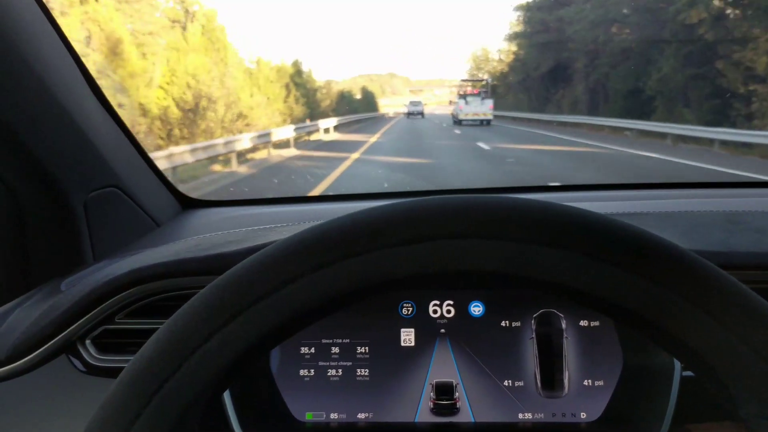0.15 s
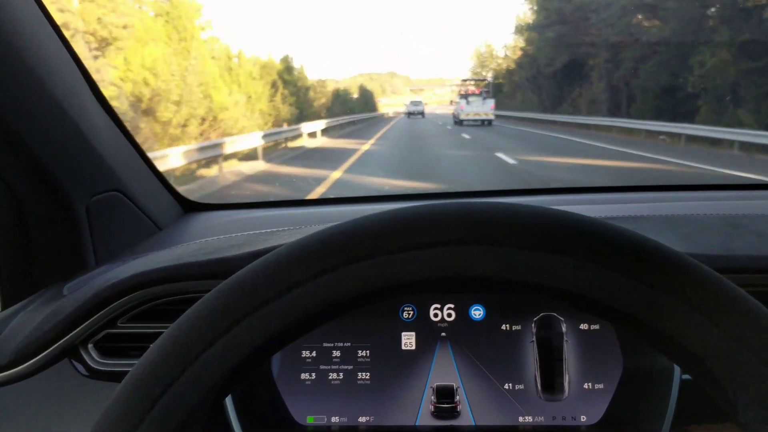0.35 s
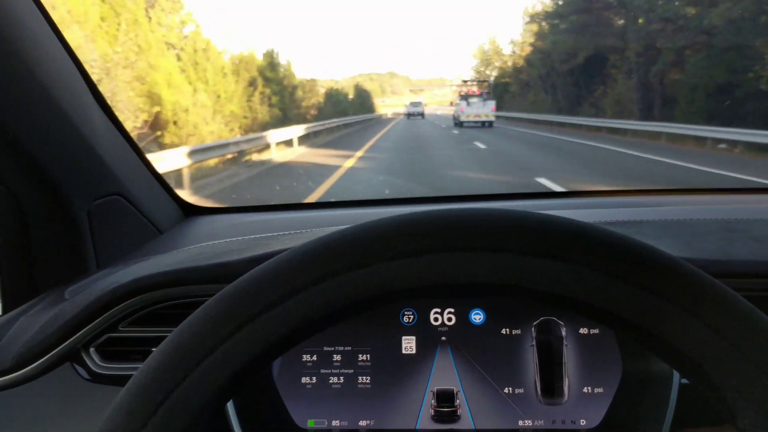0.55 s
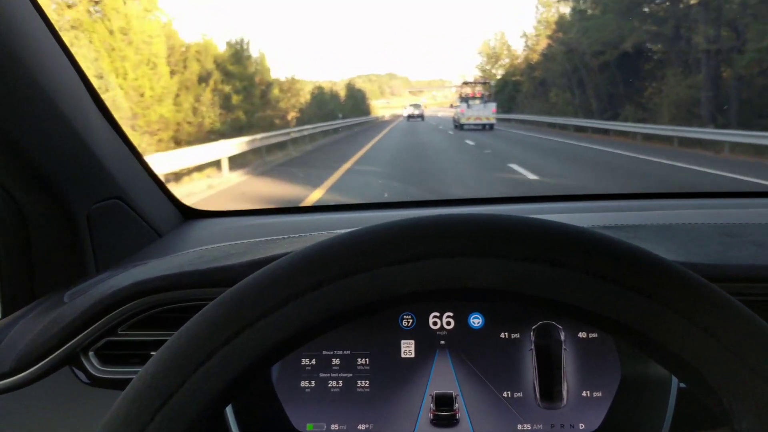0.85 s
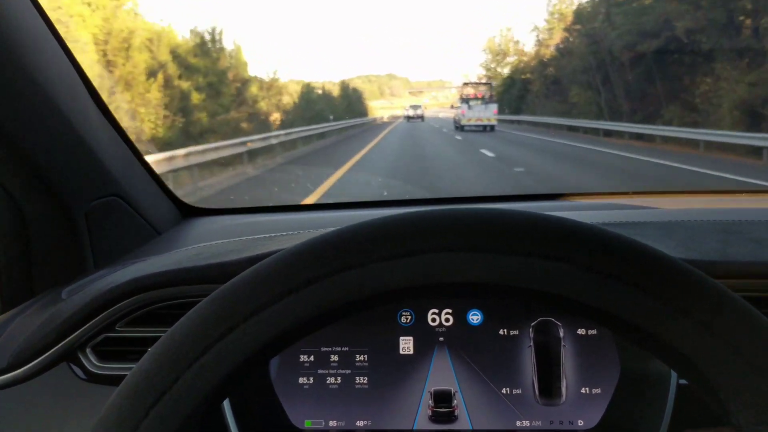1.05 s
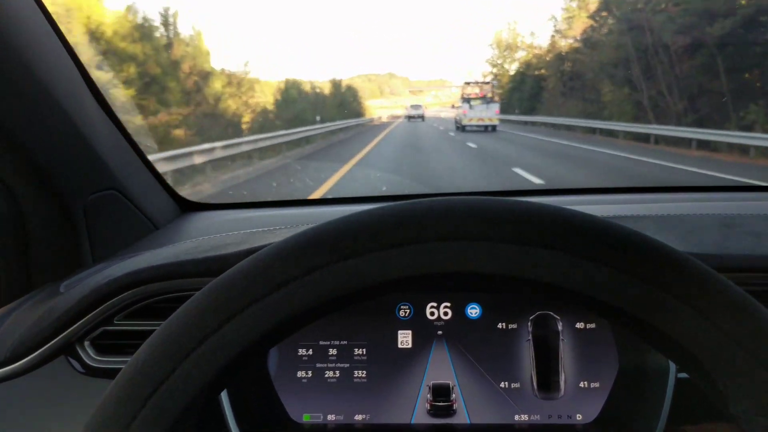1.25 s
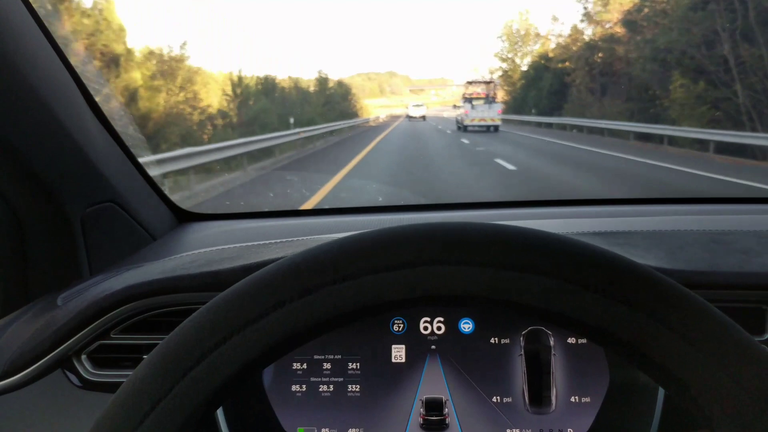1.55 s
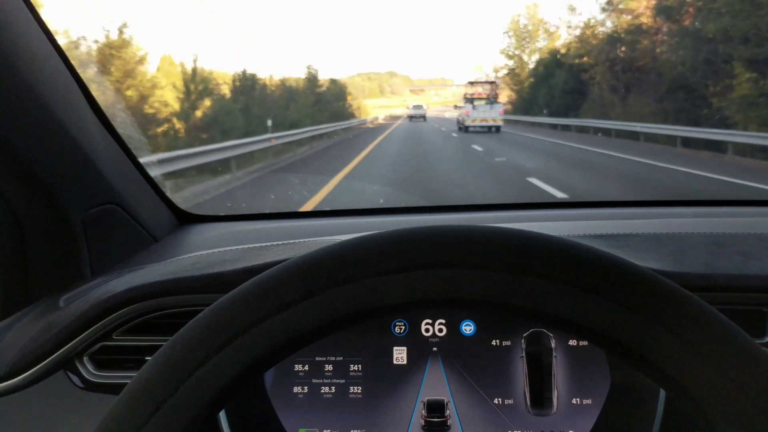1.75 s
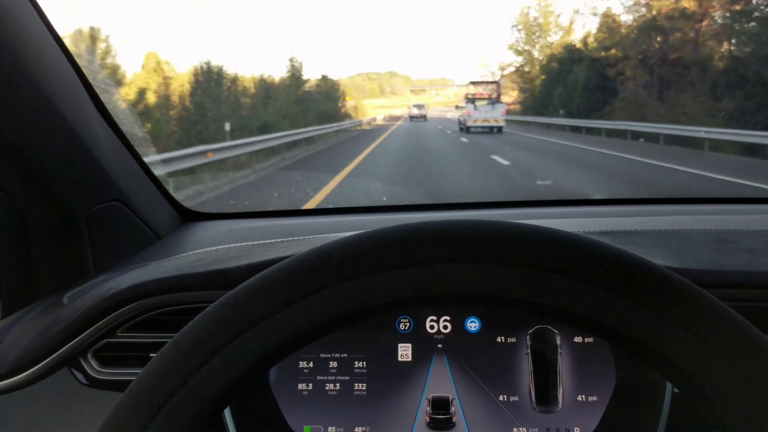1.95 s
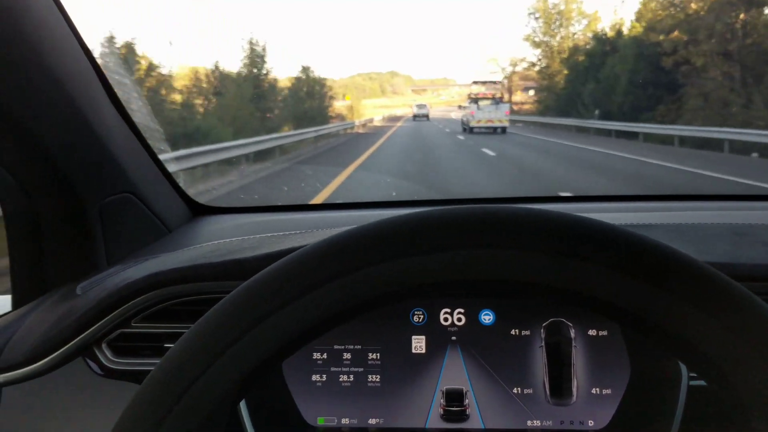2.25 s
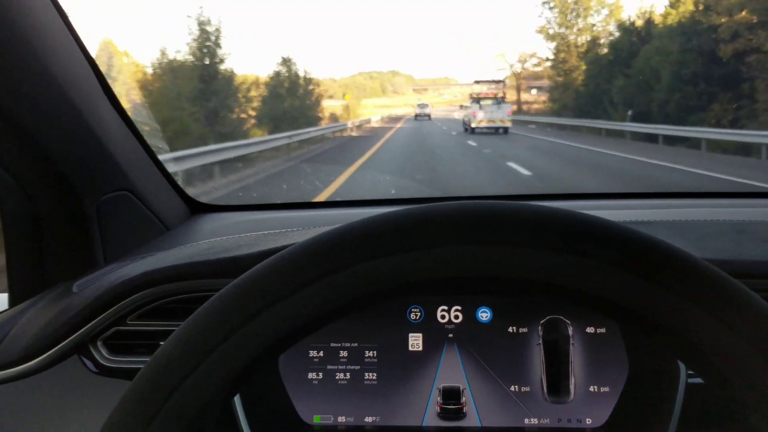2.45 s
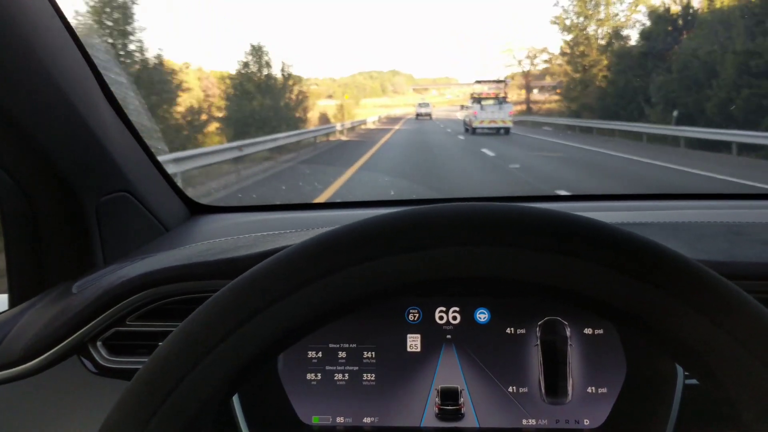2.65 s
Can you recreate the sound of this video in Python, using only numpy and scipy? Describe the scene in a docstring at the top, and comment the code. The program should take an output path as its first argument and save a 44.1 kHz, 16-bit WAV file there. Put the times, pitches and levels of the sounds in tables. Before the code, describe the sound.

Continuous highway road noise from inside a moving car: a wavering low boom and soft, dull wind roar throughout, no engine, a few very faint dry ticks and slight hiss at the cabin microphone.

```python
"""Road noise inside a quiet electric car at highway speed, as a microphone in the cabin hears it.
Random road texture shakes the tyres and body: a wavering low boom, heave and rumble come in lumps.
Tread and wind roar lies above, with cabin and panels ringing at fixed resonances.
Faint double ticks, trim clicks and a thin pulsing whine sit near the microphone's own hiss."""
import sys
import numpy as np
from scipy import signal
from scipy.fft import rfft, irfft, next_fast_len
from scipy.io import wavfile
from scipy.ndimage import uniform_filter1d

SR = 44100
rng = np.random.default_rng(int(sys.argv[2]) if len(sys.argv) > 2 else 0)


def materialize(psi):
    """Save the field psi as 16-bit PCM at rate SR to the path in sys.argv[1].

    A 1-D psi becomes a single channel; in a 2-D psi each row is a channel.
    """
    bounded = np.clip(np.atleast_2d(psi).T, -1, 1)
    quanta = np.round(bounded * 32767).astype(np.int16)
    wavfile.write(sys.argv[1], SR, quanta)


def nominal_scale(level):
    """Amplitude ratio for a level in decibels (scalar or array-like)."""
    x = np.asarray(level, float) / 20
    return 10 ** x


N = 123479  # samples, 2.8 s


def rms_one(x):
    """Scales a signal to an rms of 1."""
    return x / np.sqrt(np.mean(x ** 2) + 1e-20)


def in_time(rows):
    """Draws each column after start_s as a curve, straight between its points."""
    start_s, *columns = np.transpose(rows)
    return [np.interp(np.arange(N) / SR, start_s, column) for column in columns]


def coloured(shape):
    """Noise with the given spectrum, straight in dB over log frequency; rms 1."""
    size = next_fast_len(N)
    hz = np.maximum(np.arange(size // 2 + 1) * SR / size, 1)
    shape_hz, shape_db = np.transpose(shape)
    gain = nominal_scale(np.interp(np.log(hz), np.log(shape_hz), shape_db))
    spectrum = rfft(rng.standard_normal(size)) * gain
    return rms_one(irfft(spectrum, size)[:N])


def drift(rate_hz):
    """Slow random wander of spread 1: noise through two equal low-pass poles at rate_hz."""
    step = 40  # samples between drawn points
    r = np.exp(-2 * np.pi * rate_hz * step / SR)
    settle = 2000  # points dropped while the filter settles
    noise = rng.standard_normal(N // step + 2 + settle)
    slow = signal.lfilter([1], [1, -2 * r, r * r], noise)[settle:]
    return np.interp(np.arange(N) / step, np.arange(len(slow)), rms_one(slow - slow.mean()))


def resonate(x, hz, width_hz):
    """Two-pole resonance, gain 1 on top."""
    r = np.exp(-np.pi * width_hz / SR)
    zeros = np.array([1, 0, -1]) * (1 - r * r) / 2
    poles = [1, -2 * r * np.cos(2 * np.pi * hz / SR), r * r]
    return signal.lfilter(zeros, poles, x)


def resonate_twice(x, hz, width_hz):
    """The same resonance passed twice, for steeper sides."""
    return resonate(resonate(x, hz, width_hz), hz, width_hz)


def humming(hz, width_hz):
    """Road shaking heard through one steep resonance; rms 1."""
    shaking = rng.standard_normal(N + SR // 2)  # the first half second lets the ring build up
    return rms_one(resonate_twice(shaking, hz, width_hz)[-N:])


def evened(x, share, window_s):
    """Takes out a share of the noise's own slow swell, so that the level curve rules; rms 1."""
    power = uniform_filter1d(x ** 2, int(window_s * SR))
    return rms_one(x / (power + 0.0011) ** (share / 2))


def swelling(modes, level_db, share, window_s):
    """Resonances that rise and fall together on one level curve."""
    ringing = sum(nominal_scale(db) * evened(humming(hz, width_hz), share, window_s) for hz, width_hz, db in modes)
    return nominal_scale(level_db) * ringing


def impulses(start_s, level_db):
    """Single-sample knocks at the given times, in near silence."""
    out = np.full(N, 1e-18)
    out[(np.asarray(start_s) * SR).astype(int)] = nominal_scale(level_db)
    return out


# wavering boom, before the lumps set the overall level: start_s, level_db
BOOM_LEVEL = [(0.03, -29), (0.31, -37.5), (0.63, -32.5), (0.67, -45), (0.7, -36), (0.85, -32.5),
              (0.91, -49), (0.96, -35), (2.08, -39.5), (2.15, -26), (2.23, -35), (2.38, -31.5),
              (2.71, -34.5), (2.75, -44.5)]
# noise below and above the boom, on the same relative scale: start_s, heave_db, rumble_db
HEAVE_AND_RUMBLE_LEVEL = [(0.03, -38.5, -30.5), (0.05, -36, -32), (0.35, -38, -40), (0.39, -42, -30),
                          (0.42, -40, -32), (0.57, -33.5, -35), (0.61, -41, -23), (0.67, -44, -40),
                          (1.07, -39.5, -35.5), (1.13, -48, -39), (1.17, -33.5, -37), (1.33, -43, -43),
                          (2.73, -38.5, -35), (2.75, -38, -26)]
# spectrum of the broad rumble: frequency_hz, relative_db
RUMBLE_SPECTRUM = [(45, -38), (65, -13), (88, -2), (105, -3), (145, -4.5), (180, -14), (235, -20),
                   (300, -80)]
# spectrum of the slow heave: frequency_hz, relative_db
HEAVE_SPECTRUM = [(12, -57), (22, -26), (30, 1.5), (40, 16.5), (51, 19), (62, 15.5), (75, 2), (95, -49)]
# surges of the whole low end: start_s, level_db
LUMP_LEVEL = [(0.02, -30.5), (0.07, -32.5), (0.09, -34), (0.14, -29), (0.38, -35), (0.4, -29), (0.44, -30),
              (0.46, -36.5), (0.5, -29), (0.54, -36), (0.56, -29.5), (0.63, -31), (0.66, -34),
              (0.68, -31.5), (0.8, -27.5), (0.83, -38), (0.85, -23.5), (0.87, -34), (0.93, -32.5),
              (0.95, -26), (1.0, -32), (1.01, -43), (1.04, -25.5), (1.15, -33.5), (1.19, -25), (1.21, -31),
              (1.39, -30), (1.42, -42), (1.45, -26.5), (1.56, -34.5), (1.58, -30), (1.79, -30.5),
              (1.95, -33.5), (1.97, -32), (2.09, -32.5), (2.15, -25), (2.25, -34), (2.26, -31.5),
              (2.33, -28.5), (2.36, -32.5), (2.39, -26), (2.41, -33), (2.43, -28.5), (2.48, -25),
              (2.49, -33), (2.58, -28.5), (2.61, -33), (2.64, -29), (2.76, -31.5), (2.78, -30)]
BOOM_HZ, BOOM_WANDER_HZ, BOOM_FLICKER_DB = 74.65, 5.02, 2.5  # centre, spread of pitch, spread of level


def low_end():
    """Slow heave and broad rumble around a boom whose pitch wanders; together they come in lumps."""
    heave_db, rumble_db = in_time(HEAVE_AND_RUMBLE_LEVEL)
    boom_pitch_hz = BOOM_HZ + BOOM_WANDER_HZ * drift(8.4)
    boom_db = in_time(BOOM_LEVEL)[0] + BOOM_FLICKER_DB * drift(18.0)
    phase = 2 * np.pi * np.cumsum(boom_pitch_hz) / SR
    boom = nominal_scale(boom_db) * rms_one(np.sin(phase))
    heave = nominal_scale(heave_db) * evened(coloured(HEAVE_SPECTRUM), share=0.47, window_s=0.16)
    rumble = nominal_scale(rumble_db) * evened(coloured(RUMBLE_SPECTRUM), share=0.35, window_s=0.08)
    together = rms_one(boom + heave + rumble)
    return nominal_scale(in_time(LUMP_LEVEL)[0]) * evened(together, share=0.85, window_s=0.035)


# tread and wind roar, and the panels ringing with the road: start_s, roar_db, panel_db
ROAR_AND_PANEL_LEVEL = [(0, -42.5, -46), (.25, -42.5, -50), (.5, -41.5, -44), (.72, -43.5, -52.5),
                        (1.0, -42, -46), (1.25, -43.5, -51), (1.52, -41.5, -46), (1.75, -41, -51),
                        (1.9, -42, -52), (2.06, -41.5, -44.5), (2.25, -41.5, -49.5), (2.55, -41.5, -47.5),
                        (2.8, -42.5, -45)]
# spectrum of the roar: frequency_hz, relative_db
ROAR_SPECTRUM = [(150, -20), (230, 0), (450, -2), (650, -2), (1000, -3), (1400, -7), (2100, -13),
                 (2800, -19), (3200, -25), (4000, -29), (5000, -36), (6200, -41), (7200, -50), (10000, -80)]


def tread_and_wind_roar():
    """Tread and wind leak in as noise of a fixed spectrum whose level flickers slightly."""
    roar_db = in_time(ROAR_AND_PANEL_LEVEL)[0] + 0.4 * drift(1.5)
    return nominal_scale(roar_db) * coloured(ROAR_SPECTRUM)


# steady resonances of tyre, floor and cabin, each passed twice: pitch_hz, width_hz, level_db
BODY_MODES = [(131.7, 8.2, -46), (185.6, 22, -51.5), (248, 34, -55.5), (416, 69, -59.5), (527, 58, -64.5),
              (593, 31, -61), (930, 69, -55.5), (1112, 75, -54.5), (1188, 110, -53.5), (1341, 38, -60),
              (1477, 13, -64.5), (1550, 66, -62)]


def body_resonances():
    """Random road shaking keeps the fixed resonances of tyre, floor and cabin humming."""
    return sum(nominal_scale(db) * humming(hz, width_hz) for hz, width_hz, db in BODY_MODES)


# swell of the hollow cabin ring: start_s, level_db
CABIN_LEVEL = [(0.0, -45.5), (0.06, -34), (0.09, -45), (0.59, -40), (0.63, -46), (0.93, -40), (0.95, -45.5),
               (1.46, -43), (1.54, -51.5), (1.57, -40), (1.78, -48), (1.84, -40), (2.38, -45.5),
               (2.43, -41), (2.47, -47), (2.8, -43)]
# cabin resonances, each passed twice: pitch_hz, width_hz, relative_db
CABIN_RING = [(306.8, 54, -6), (360.4, 53, -3)]


def cabin_ring():
    """The cabin rings hollowly at two fixed resonances that swell together."""
    return swelling(CABIN_RING, in_time(CABIN_LEVEL)[0], share=0.2, window_s=0.059)


# panel resonances, each passed twice: pitch_hz, width_hz, relative_db
PANEL_MODES = [(718, 25.3, -1.5), (790, 45, -0.5)]


def ringing_panels():
    """Panels shaken by the road ring at two fixed resonances that swell together."""
    panel_db = in_time(ROAR_AND_PANEL_LEVEL)[1]
    return swelling(PANEL_MODES, panel_db, share=0.35, window_s=0.07)


# double ticks, strength of the knock before its resonances: start_s, level_db
DOUBLE_TICKS = [(.3019, -43), (.3685, -43.5), (.411, -43), (.4649, -42), (1.5639, -42.5), (1.6248, -42),
                (1.6648, -42.5), (1.7012, -42.5), (2.5638, -42.5), (2.6041, -43.5), (2.6648, -42),
                (2.7048, -42.5)]
TICK_GAP_S, SECOND_TICK_DB = 0.0121, 1  # second snap after the first, and its relative strength
REBOUND_S, REBOUND_DB = 0.0039, -6  # rebound after the first snap, and its relative strength
TICK_HZ, SECOND_TICK_HZ, DULL_TICK_HZ, TICK_WIDTH_HZ = 8700, 9300, 6000, 3600  # each passed twice


def ticks():
    """Each tick is two short dry snaps, the first with a faint rebound, the second with a duller part."""
    start_s, level_db = np.transpose(DOUBLE_TICKS)
    rebound = impulses(start_s + REBOUND_S, level_db + REBOUND_DB)
    first = impulses(start_s, level_db) + rebound
    second = impulses(start_s + TICK_GAP_S, level_db + SECOND_TICK_DB)
    first_snap = resonate_twice(first, TICK_HZ, TICK_WIDTH_HZ)
    second_snap = resonate_twice(second, SECOND_TICK_HZ, TICK_WIDTH_HZ)
    dull_part = nominal_scale(-4) * resonate_twice(second, DULL_TICK_HZ, TICK_WIDTH_HZ)
    return first_snap + second_snap + dull_part


# trim clicks, strength of the knock that starts them: start_s, level_db
TRIM_HITS = [(.3415, -52), (1.4303, -63)]
# ringing of the trim: pitch_hz, relative_db, t60_s
TRIM_MODES = [(4050, 0, .025), (4600, -5, .01), (5600, -4, .009), (6250, -5, .009), (7800, -12, .007),
              (9600, -10, .005), (10600, -4, .005), (12200, -12, .004)]
SNAP_DB, SNAP_T60_S, SNAP_HZ, SNAP_WIDTH_HZ = 1, 0.012, 6000, 6000  # noise burst, relative to the knock


def trim_clicks():
    """Plastic trim snaps, a short burst of noise, and rings briefly in decaying sines."""
    hits = impulses(*np.transpose(TRIM_HITS))
    decay = signal.lfilter([nominal_scale(SNAP_DB)], [1, -nominal_scale(-60 / (SNAP_T60_S * SR))], hits)
    out = resonate(decay * rng.standard_normal(N), SNAP_HZ, SNAP_WIDTH_HZ)
    for hz, db, t60_s in TRIM_MODES:
        r = nominal_scale(-60 / (t60_s * SR))
        w = 2 * np.pi * hz / SR
        out = out + nominal_scale(db) * signal.lfilter([0, np.sin(w)], [1, -2 * r * np.cos(w), r * r], hits)
    return out


# course of the thin whine, before its random wander: start_s, pitch_hz
WHINE_PITCH = [(0, 11820), (.16, 11880), (.25, 11800), (.34, 12120), (.43, 12040), (.6, 12220),
               (.76, 12000), (.85, 12140), (.96, 11950), (1.03, 12250), (1.11, 12010), (1.24, 12040),
               (1.3, 12270), (1.54, 12250), (1.63, 12080), (1.83, 12100), (2.03, 11980), (2.16, 12140),
               (2.3, 12080), (2.52, 12420), (2.64, 12160), (2.8, 12300)]
WHINE_DB, WHINE_FLICKER_DB, WHINE_WANDER_HZ = -88.5, 0.8, 50
PULSES_PER_S, PULSE_PEAK_S = 30, 0.019  # pulse rate, and the time of one pulse's peak


def whine():
    """A thin high sine wanders in pitch and pulses steadily."""
    pitch_hz = in_time(WHINE_PITCH)[0] + WHINE_WANDER_HZ * drift(25)
    tone = np.sin(2 * np.pi * np.cumsum(pitch_hz) / SR)
    time_s = np.arange(N) / SR
    pulses = 0.5 + 0.5 * np.cos(2 * np.pi * PULSES_PER_S * (time_s - PULSE_PEAK_S))
    return nominal_scale(WHINE_DB + WHINE_FLICKER_DB * drift(8)) * rms_one(pulses ** 1.6 * tone)


# spectrum of the microphone's own hiss: frequency_hz, relative_db
HISS_SPECTRUM = [(3000, -6), (5000, -1), (8000, 0), (12000, -2), (16000, -2.7)]


def microphone_hiss():
    """The microphone's own steady noise, at -75 dB."""
    return nominal_scale(-75) * coloured(HISS_SPECTRUM)


def scene():
    """Everything heard in the cabin, as one channel."""
    road = low_end() + (tread_and_wind_roar() + body_resonances() + cabin_ring() + ringing_panels())
    return (road + ticks() + trim_clicks() + whine())[None]


def low_pass(x):
    """Removes everything above the highest recorded frequency."""
    return signal.sosfilt(signal.butter(12, 15720, fs=SR, output="sos"), x)


def record(dry):
    """The microphone adds its hiss to the cabin sound."""
    mix = dry + microphone_hiss()
    return low_pass(mix)


dry = scene()
out = record(dry)
materialize(out)
```